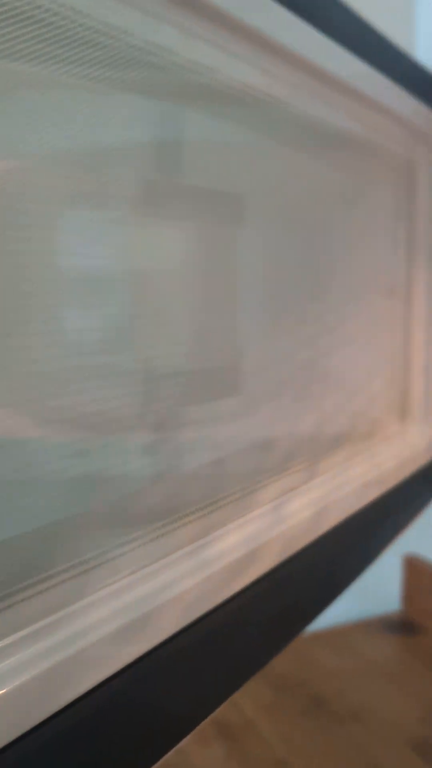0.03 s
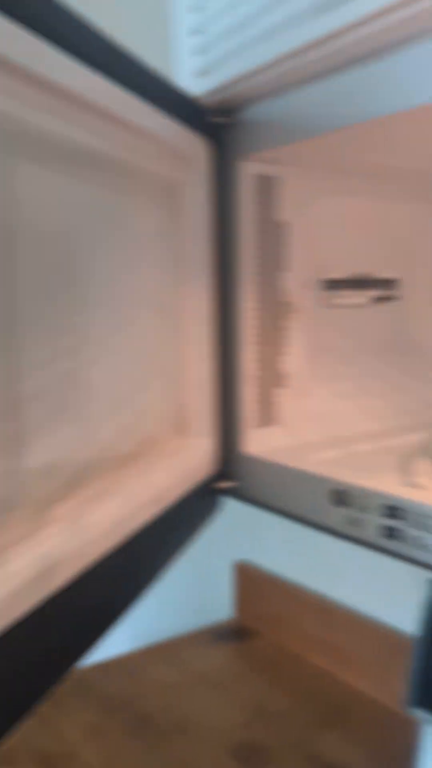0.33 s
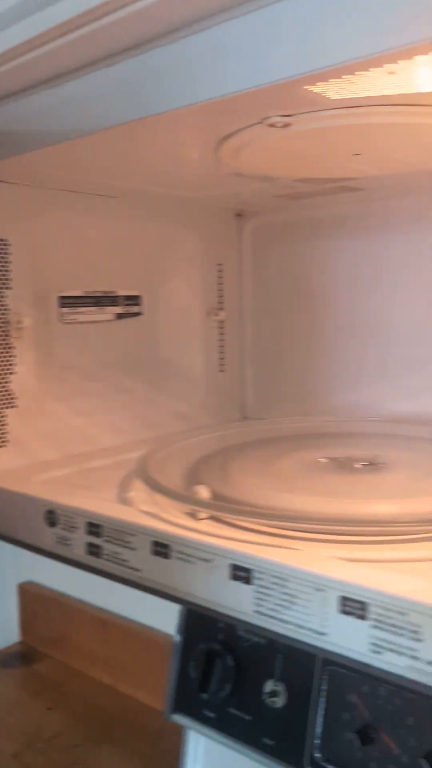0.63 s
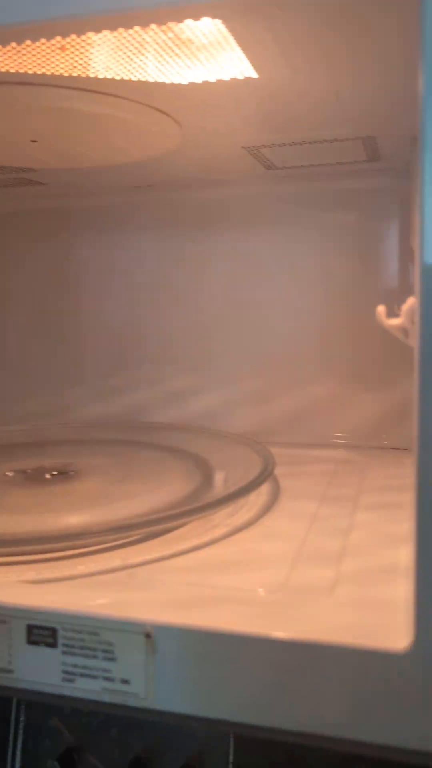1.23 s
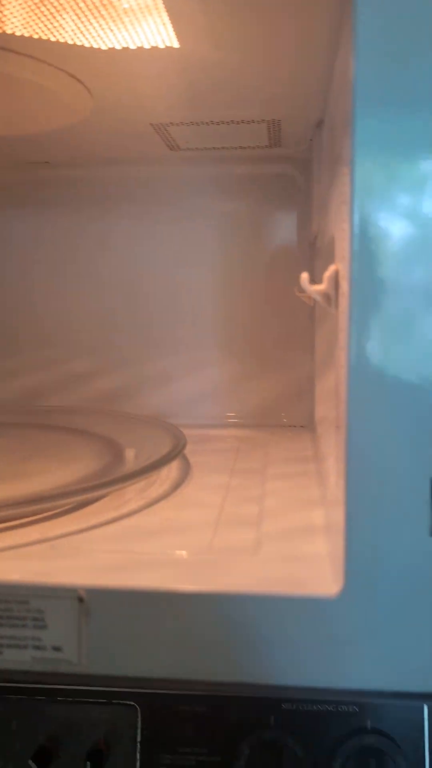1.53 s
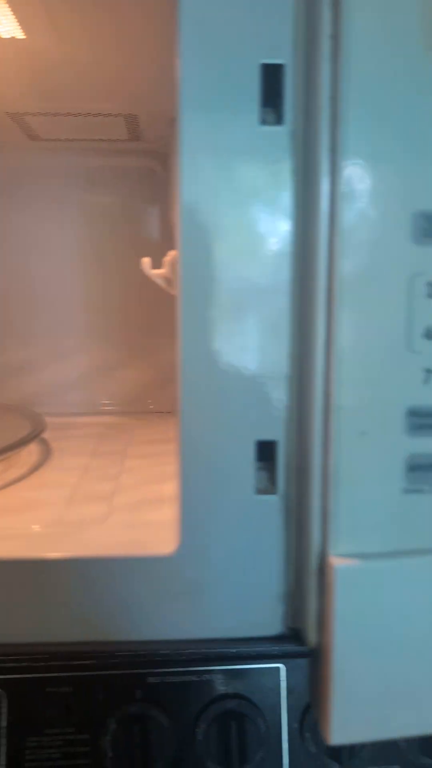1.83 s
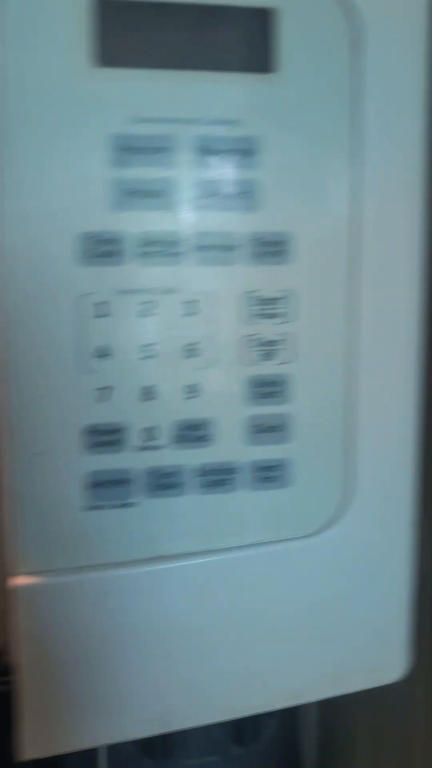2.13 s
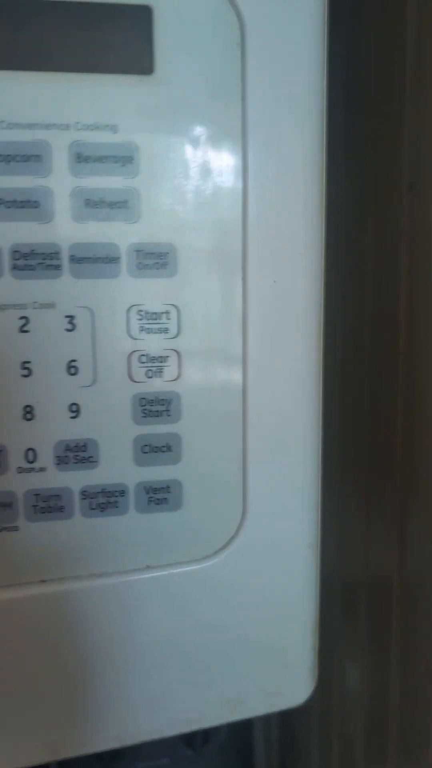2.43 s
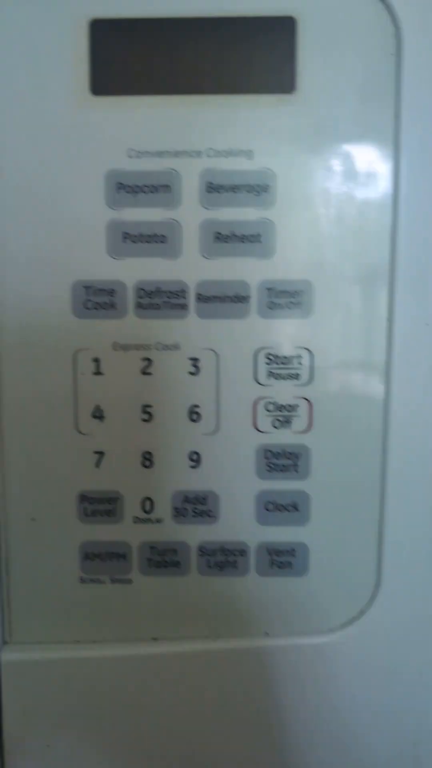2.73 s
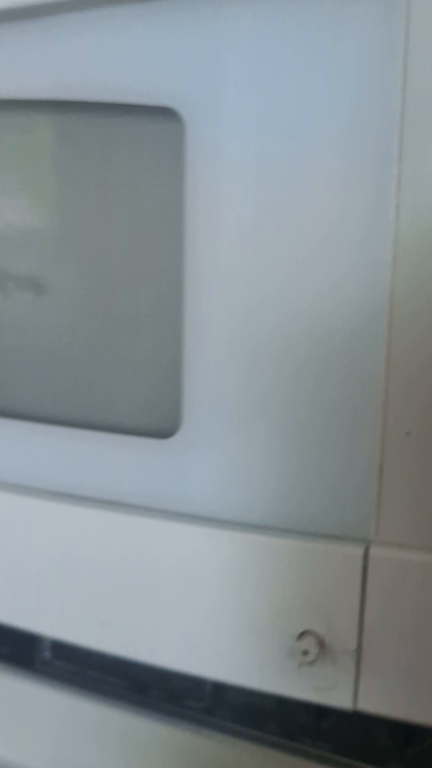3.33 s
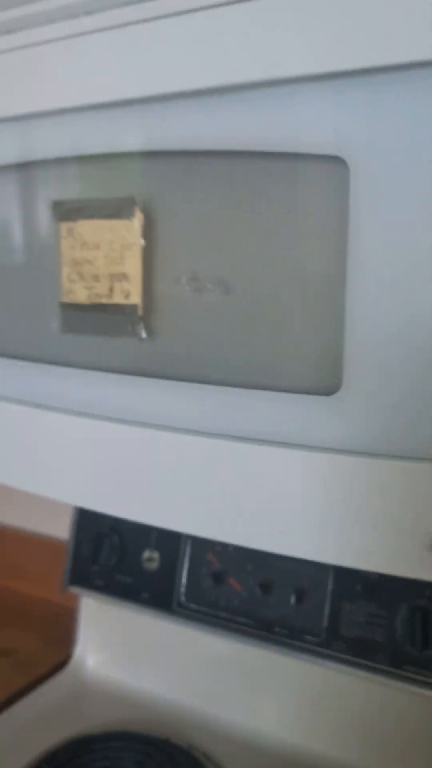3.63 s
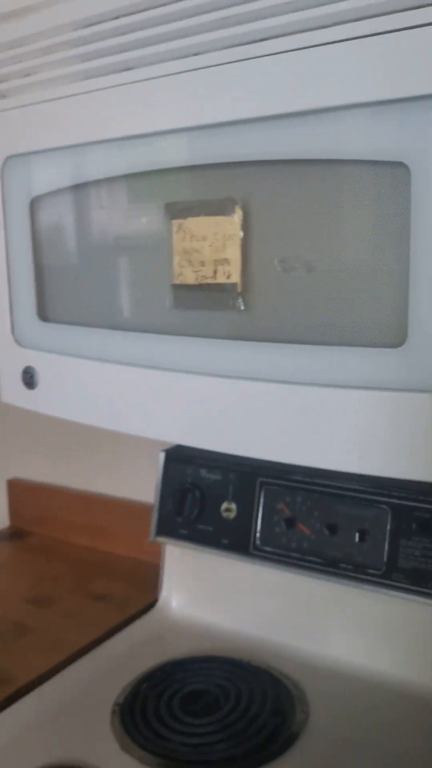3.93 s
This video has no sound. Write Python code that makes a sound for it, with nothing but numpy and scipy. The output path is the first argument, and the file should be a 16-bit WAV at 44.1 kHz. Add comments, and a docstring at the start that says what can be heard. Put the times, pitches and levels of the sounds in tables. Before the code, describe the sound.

Over a low machine drone that shifts as the microphone moves, clothes rustle softly. Then a microwave door is slammed, with a plastic latch snap and a brief metal boom, followed by a little click in the echoing kitchen.

```python
"""In a small, echoing kitchen, a microwave door is slammed. Its plastic hooks scrape over the catches,
the latch snaps, the door sets the steel case booming, and one small click follows.
Behind it a machine drones at about 14 turns a second, changing tone as the microphone moves.
Before the slam, clothes rustle, with soft bumps and a tick, over a low rumble and faint hiss."""
import sys
import numpy as np
from scipy import signal
from scipy.fft import rfft, irfft
from scipy.io import wavfile

SR = 44100
rng = np.random.default_rng(int(sys.argv[2]) if len(sys.argv) > 2 else 0)


def master(y):
    """Save y as 16-bit WAV."""
    cut = np.clip(np.atleast_2d(y).T, -1, 1)
    pcm = np.round(cut * 32767)  # scale
    wavfile.write(sys.argv[1], SR, pcm.astype(np.int16))


N = 176400
TIME = np.arange(N) / SR
FREQS = np.fft.rfftfreq(N, 1 / SR)


def amp(db):
    """Turns decibels into a volume multiplier."""
    return np.exp(np.asarray(db) * (np.log(10) / 20))


def unit(x):
    """Scales a signal to an average power of one."""
    return x / np.sqrt(np.mean(x ** 2) + 1e-20)


def curve(points):
    """Joins (time, value) points with straight lines."""
    return np.interp(TIME, *np.transpose(points))


def at_frequency(points, hz):
    """Looks up a (frequency, value) table, with octaves evenly spaced."""
    freqs, values = np.transpose(points)
    return np.interp(np.log(hz + 1), np.log(freqs + 1), values)


def drift(rate_hz):
    """A random wobble; a higher rate wobbles faster."""
    steps = rng.standard_normal(int(rate_hz * 2 * N / SR) + 2)
    return unit(np.interp(TIME, np.arange(len(steps)) / (2 * rate_hz), steps))


def dying(t, decay):
    """Stays at one until t = 0, then fades away."""
    return np.exp(-np.clip(t / decay, 0, 30))


def grainy_noise(depth_db, rate_hz):
    """Stereo noise whose loudness flickers."""
    return unit(amp(depth_db * drift(rate_hz)) * rng.standard_normal((2, N)))


def bursts(rows, rise_s=0.0067, hold_s=0.0025):
    """Things touching: each (time, level, decay) row is a quick, grainy rattle."""
    level = sum(amp(db) * np.clip((TIME - s) / rise_s + .5, 0, 1) * dying(TIME - s - hold_s, decay)
                for s, db, decay in rows)
    return level * grainy_noise(depth_db=2, rate_hz=1500)


# how alike left and right sound (frequency [Hz], likeness [0-1])
LIKENESS = [(100, 0.95), (200, .93), (450, 0.78), (1000, .05)]
def colour(x, tone, resonances=()):
    """Gives noise a tone and ringing peaks; the bass is alike in both ears."""
    size = 4096
    hz = abs(np.fft.fftfreq(size, 1 / SR))
    gain = amp(at_frequency(tone, hz))
    for centre, width, db in resonances:
        gain = gain + amp(db) / (1 + (2 * (hz - centre) / width) ** 2)
    # this filter rings only after a sound, never before it
    response = np.exp(signal.hilbert(np.log(gain + 1e-6)).conj())
    taps = np.fft.ifft(response).real[:size // 2]
    taps = taps / np.linalg.norm(taps)
    same = at_frequency(LIKENESS, FREQS)
    mid, side = irfft(rfft(x) * np.sqrt([1 + same, 1 - same]) / np.sqrt(2), N)
    return signal.oaconvolve(np.array([mid + side, mid - side]), taps[None], axes=1)[:, :N]


# how long the echo lasts (frequency [Hz], time to fade by 60 dB [s])
ECHO_LENGTH = [(100, 0.85), (600, 0.77), (2500, 0.88), (5000, 0.68), (8000, 0.57), (16000, .41)]
# tone of the echo (frequency [Hz], level [dB])
ECHO_TONE = [(100, 7.5), (500, 1), (2500, -2.5), (14000, -1)]
def kitchen_echo(x, echo_db):
    """Adds the room's many reflections, each frequency fading at its own speed."""
    hz, t, noise = signal.stft(rng.standard_normal((2, SR)), SR, nperseg=512)
    hz = hz[:, None]
    same = at_frequency(LIKENESS, hz)
    bands = np.array([noise[0], same * noise[0] + np.sqrt(1 - same ** 2) * noise[1]])
    fade = np.exp(-np.log(1000) * t / at_frequency(ECHO_LENGTH, hz))
    bands = bands * amp(at_frequency(ECHO_TONE, hz)) * fade
    delay_s, build_s = 0.0038, 0.0077
    onset = np.clip((TIME[:SR] - delay_s) / build_s, 0, 1)
    tail = signal.istft(bands, SR, nperseg=512)[1][:, :SR] * onset
    return x + amp(echo_db) * signal.fftconvolve(x, tail / np.linalg.norm(tail[0]), axes=1)[:, :N]


# tones of the room's hiss and rumble (frequency [Hz], level [dB])
HISS_TONE = [(400, -0.5), (1000, -6), (1800, -4), (3400, -6.5), (6000, -20), (16000, -43.5)]
RUMBLE_TONE = [(25, -27), (65, 2.5), (230, -1), (330, -6), (480, -18), (700, -29.5), (1600, -51.5),
               (8000, -78)]
# how loud each is (time [s], level [dB])
HISS_LOUDNESS = [(0, -70), (0.702, -62.5), (0.998, -64), (1.5, -63), (1.9, -64), (2.4, -59.5),
                 (3.502, -56.5), (4, -58)]
RUMBLE_LOUDNESS = [(0, -48.5), (2.601, -41.5), (3.298, -38.5)]
def room_noise():
    """A soft hiss of air over a low rumble."""
    hiss = amp(curve(HISS_LOUDNESS)) * colour(rng.standard_normal((2, N)), HISS_TONE)
    rumble = amp(curve(RUMBLE_LOUDNESS)) * colour(rng.standard_normal((2, N)), RUMBLE_TONE)
    return hiss + rumble


# how loud the thin hiss is (time [s], level [dB])
THIN_HISS_LOUDNESS = [(.9, -72), (1.2, -56), (1.8, -70.5), (2.55, -71.5), (2.72, -53), (2.9, -68.5)]
def thin_hiss(centre_hz=1790, width_hz=230):
    """A faint, narrow band of hiss that swells twice, while things move."""
    band = np.exp(-((FREQS - centre_hz) / width_hz) ** 2 / 2)
    hiss = irfft(rfft(rng.standard_normal((2, N))) * band, N)
    return amp(curve(THIN_HISS_LOUDNESS)) * unit(hiss)


# how fast the machine turns (time [s], speed [turns/s])
MACHINE_SPEED = [(0, 13.97), (.8, 14.31), (1.3, 14.34), (1.8, 14.48), (2.3, 14.52), (3.3, 14.56),
                 (3.6, 14.38), (4, 13.96)]
# its two main tones (time [s], lower tone [dB], upper tone [dB])
MAIN_TONES = [(.1, -27.5, -41.5), (.55, -29, -30.5), (1.6, -29, -30), (2.0, -21, -30.5),
              (2.5, -33.5, -31.5), (3.3, -27, -30.5), (3.6, -36, -38.5)]
# its weaker tones (pitch [times the speed], level at first spot [dB], level at second spot [dB])
WEAK_TONES = [(5, -52.5, -40), (7, -46.5, -48), (9, -48, -37), (10, -48.5, -35.5), (11, -52.5, -30),
              (12, -52, -34), (13, -41.5, -32), (14, -45.5, -44.5), (16, -37.5, -37.5), (17, -51, -41),
              (19, -44, -60.5), (21, -55.5, -55.5)]
# boost for all the weaker tones (time [s], level [dB])
WEAK_BOOST = [(0, -2), (.6, -2), (2.6, 3), (3.3, 4.5), (3.7, 0)]
# the microphone's way from the first spot to the second (time [s], share of the way [0-1])
MIC_PATH = [(1.0, 0.2), (2.0, 0.52), (2.6, 0.61), (3.2, 0.87)]
def machine_drone(wall_share=.55, max_dips_per_s=1.6, throb_s=3.27):
    """A machine's tones throb once a turn; a wall's reflection makes the weaker ones swell and dip."""
    turns = np.cumsum(curve(MACHINE_SPEED)) / SR
    angle = 2 * np.pi * (turns - np.interp(throb_s, TIME, turns))  # tones roughly line up at throb_s
    place, boost = curve(MIC_PATH), curve(WEAK_BOOST)
    tones = [(8, curve([(s, lower) for s, lower, _ in MAIN_TONES]), 0),
             (15, curve([(s, upper) for s, _, upper in MAIN_TONES]), 0)]
    tones += [(round(multiple), boost + first + (second - first) * place, wall_share)
              for multiple, first, second in WEAK_TONES]
    mid, side = np.zeros((2, N))  # what the ears share, and how they differ
    for multiple, db, reflected in tones:
        phase = multiple * angle + 1.1 * rng.standard_normal() + 0.22 * drift(0.94)
        # the reflection slips in and out of step as the microphone moves
        lag_cycles = rng.random() + max_dips_per_s * rng.uniform(.5, 1) * rng.choice([-1, 1]) * TIME
        gain = np.sqrt(2 / (1 + reflected ** 2)) * amp(db + 1.12 * drift(1))
        mid += gain * (np.cos(phase) + reflected * np.cos(phase + 2 * np.pi * lag_cycles))
        side += gain * np.sin(phase) * 0.11 * multiple / 8 * drift(.5)
    return np.array([mid + side, mid - side])


def swishes(rows, tone, resonances=(), offset_db=0, follow=1):
    """Rubbing strokes of grainy noise; a small `follow` evens out their levels."""
    level = sum(amp(offset_db + follow * db) * np.clip((TIME - s) / rise, 0, 1)
                * dying(TIME - s - rise, fade) for s, rise, fade, db in rows)
    return colour(level * grainy_noise(depth_db=1, rate_hz=300), tone, resonances)


# strokes of cloth, and a scuff (start [s], rise [s], fade [s], level [dB])
CLOTH_STROKES = [(.39, 0.097, 0.08, -54.5), (.588, 0.024, 0.16, -61.5), (.713, 0.02, 0.044, -66.5),
                 (1.15, 0.017, 0.053, -49.5), (1.2, 0.061, 0.13, -49.5), (1.588, 0.027, .08, -70),
                 (2.05, 0.059, 0.07, -57.5), (2.15, 0.038, 0.14, -50), (2.37, 0.033, 0.099, -59.5)]
SCUFF_STROKE = [(.375, 0.067, .055, -51)]
# tones of the rubbing and of the cloth's silky top (frequency [Hz], level [dB])
RUB_TONE = [(300, -5.5), (1100, -0.5), (2900, -2.5), (5000, -14), (15000, -38.5)]
SILKY_TONE = [(2000, -8), (6500, 1), (15000, -10)]
# the scuff's hollow ring (frequency [Hz], width [Hz], level [dB])
SCUFF_RING = [(1260, 220, 17), (2400, 1300, 8.2)]
def rustling():
    """Cloth rubs softly, light strokes sounding brightest; there is one hollow scuff."""
    cloth = swishes(CLOTH_STROKES, RUB_TONE)
    silky = swishes(CLOTH_STROKES, SILKY_TONE, offset_db=-62.5, follow=0.16)
    return cloth + silky + swishes(SCUFF_STROKE, RUB_TONE, SCUFF_RING)


# when the bumps and ticks come (time [s], level [dB])
BUMP_HITS = [(1.116, -41), (1.245, -42.5)]
TICK_HITS = [(0.8314, -46.5), (.841, -48)]
# their tones (frequency [Hz], level [dB])
BUMP_TONE = [(100, -10.5), (720, -5.5), (1100, -20), (12000, -84.5)]
TICK_TONE = [(1500, -7.5), (3600, 1), (5200, -13), (12000, -50.5)]
# the tick's ring (frequency [Hz], width [Hz], level [dB])
TICK_RING = [(2240, 87, 6.7)]
def bumps_and_tick(bump_decay_s=0.01, tick_decay_s=0.0026):
    """Two soft, dull bumps come just after a faint double tick."""
    bumps = bursts([(s, db, bump_decay_s) for s, db in BUMP_HITS], rise_s=0.011)
    ticks = bursts([(s, db, tick_decay_s) for s, db in TICK_HITS])
    return kitchen_echo(colour(bumps, BUMP_TONE) + colour(ticks, TICK_TONE, TICK_RING), echo_db=-6.5)


# the latch's scrapes, snaps and last click (time [s], level [dB], decay [s])
HOOK_SCRAPES = [(2.7655, -14, 0.0082), (2.7855, -19.5, 0.0083), (2.7995, -13.5, 0.0066)]
LATCH_SNAPS = [(2.8285, -9, 0.0036), (2.838, -11, .004)]
LATCH_CLICK = [(3.0675, -26.5, 0.0031)]
# their tones (frequency [Hz], level [dB])
SCRAPE_TONE = [(60, -0.5), (200, -4), (700, 3.5), (1100, -0.5), (1500, -12), (2500, -7), (4500, -10.5),
               (5000, -13.5), (15000, -19.5)]
SNAP_TONE = [(150, -3.5), (400, 9.5), (900, 3.5), (1400, -2), (2200, -0.5), (4000, -6), (10000, -12.5),
             (15000, -16)]
CLICK_TONE = [(3000, -13.5), (4000, 5), (6000, 0.5), (9000, -10.5), (15000, -20.5)]
# how the hooks ring (frequency [Hz], width [Hz], level [dB])
HOOK_RING = [(1857, 150, 1.5), (3830, 260, 0), (4200, 130, 0.5), (5710, 260, -5)]
def door_latch():
    """Plastic hooks ride over the catches, snap home and settle with a click."""
    scrape = kitchen_echo(colour(bursts(HOOK_SCRAPES), SCRAPE_TONE, HOOK_RING), echo_db=-2.5)
    snap = kitchen_echo(colour(bursts(LATCH_SNAPS), SNAP_TONE), echo_db=-1)
    click = kitchen_echo(colour(bursts(LATCH_CLICK), CLICK_TONE), echo_db=-3)
    return scrape + snap + click


# notes of the steel case (frequency [Hz], level [dB], time to fade by 60 dB [s])
CASE_NOTES = [(70.7, -5.5, 0.44), (130.6, -8.5, 0.33), (156.1, -7, 0.31), (324.6, -15, .28), (371, -21, .6),
              (510.7, -21.5, 0.54), (1022, -27, .42)]
# tone of its rattle (frequency [Hz], level [dB])
RATTLE_TONE = [(25, -27.5), (60, -1), (250, -1), (600, -0.5), (950, -10), (2000, -11.5), (4000, -20),
               (12000, -44)]
def door_slam(hit_s=2.841, rise_s=0.0035, rattle_db=-15, rattle_decay_s=0.014):
    """The door rattles the steel case and sets its panels booming; low notes build up more slowly."""
    t, start = TIME[:SR], round(hit_s * SR)
    boom = np.zeros((2, N))
    for hz, db, fade_s in CASE_NOTES:
        # higher notes can be further out of step between the ears
        ear_phase = np.array([[1], [-1]]) * 0.13 * hz / CASE_NOTES[1][0] * rng.uniform(-1.5, 1)
        rise = 1 - dying(2 * t, 1 / hz + rise_s)
        fade = dying(t, fade_s / np.log(1000))
        boom[:, start:start + SR] += amp(db) * rise * fade * np.sin(2 * np.pi * hz * t + ear_phase)
    rattle = colour(bursts([(hit_s, rattle_db, rattle_decay_s)]), RATTLE_TONE)
    return boom + kitchen_echo(rattle, echo_db=2.5)


def scene():
    """Everything heard in the kitchen."""
    background = machine_drone() + room_noise() + thin_hiss()
    return background + rustling() + bumps_and_tick() + door_latch() + door_slam()


# balance of the two microphones (frequency [Hz], left minus right [dB])
MIC_BALANCE = [(9000, -0.5), (14000, -6.5)]
def record(dry, low_cut_hz=62, high_cut_hz=15900, ceiling=.93):
    """The right microphone hears more treble; loud peaks are rounded, deep bass and top are cut."""
    lean_db = at_frequency(MIC_BALANCE, FREQS) / 2
    x = irfft(rfft(dry) * amp([lean_db, -lean_db]), N)
    x = signal.sosfilt(signal.butter(2, low_cut_hz, "high", fs=SR, output="sos"), x)
    x = x / (1 + abs(x / ceiling) ** 4) ** (1 / 4)
    high_cut = signal.firwin(511, high_cut_hz, window=("kaiser", 9), fs=SR)
    return signal.oaconvolve(x, high_cut[None], "same")


dry = scene()
out = record(dry)
master(out)
```